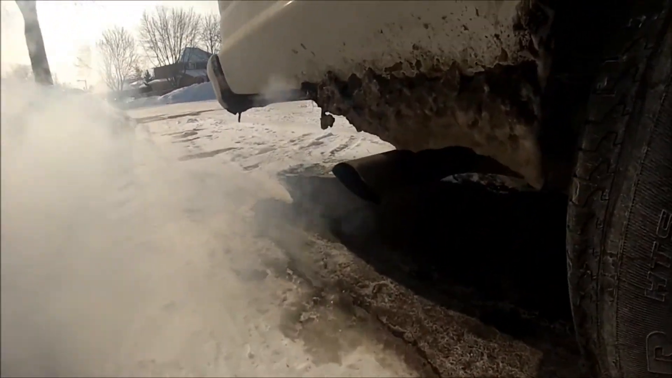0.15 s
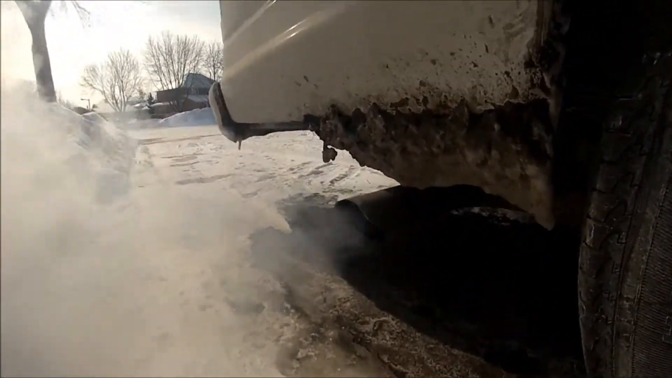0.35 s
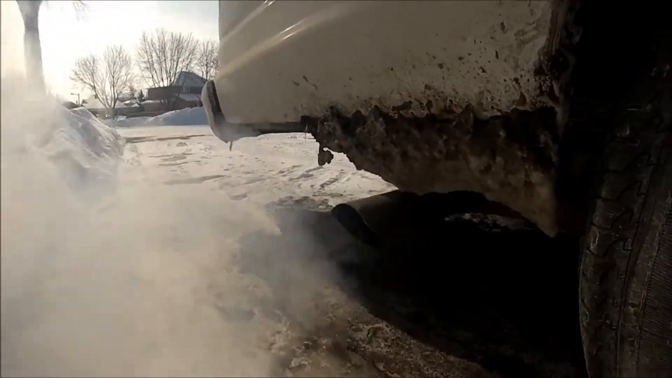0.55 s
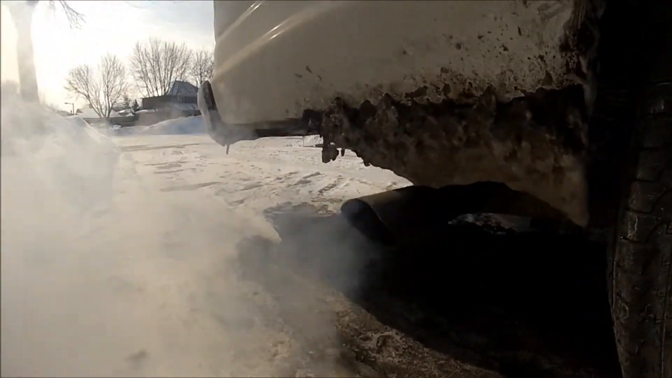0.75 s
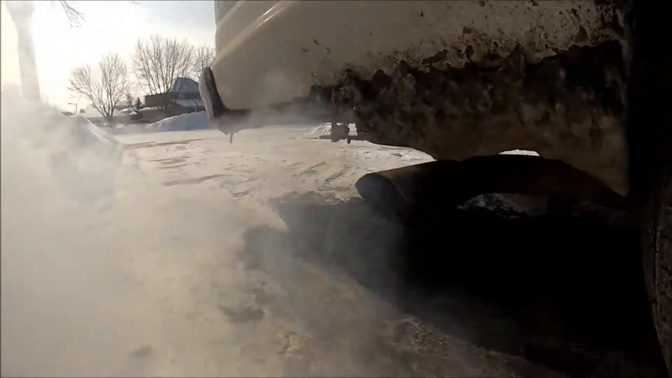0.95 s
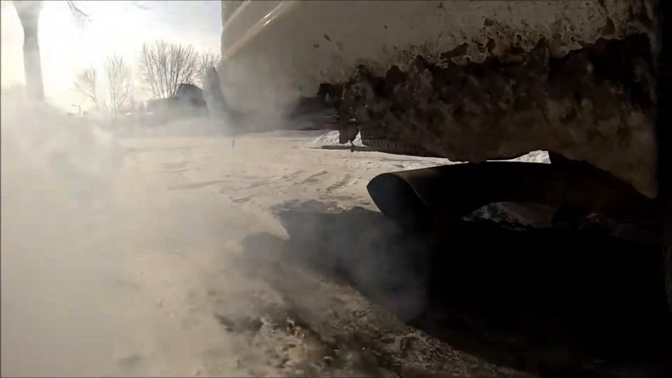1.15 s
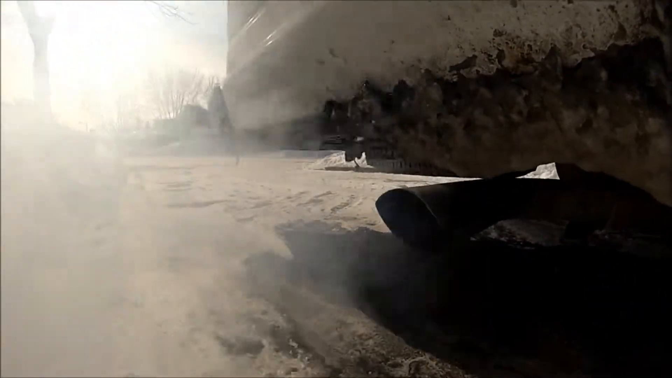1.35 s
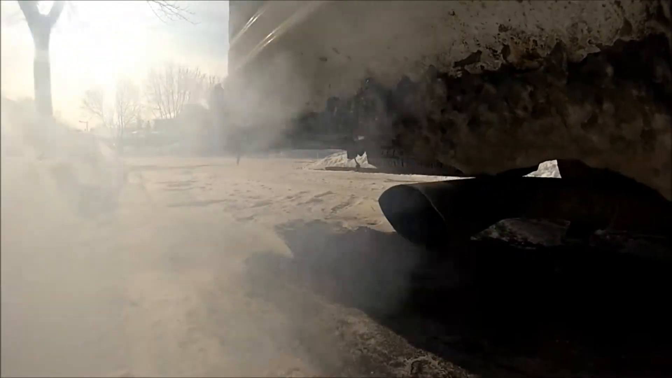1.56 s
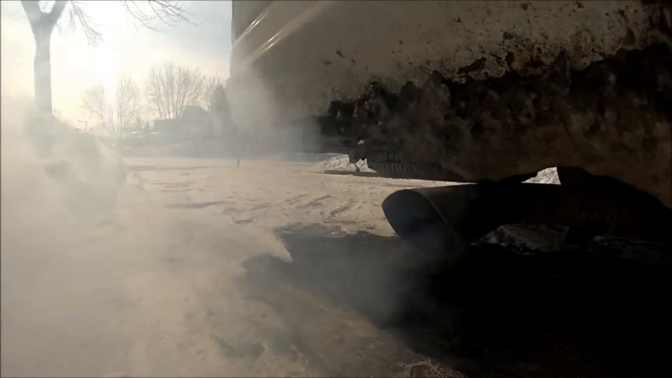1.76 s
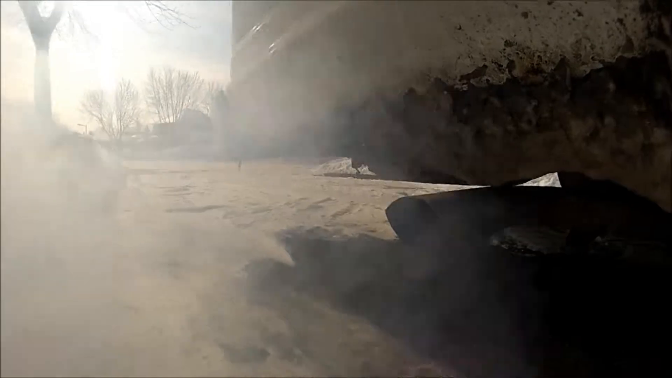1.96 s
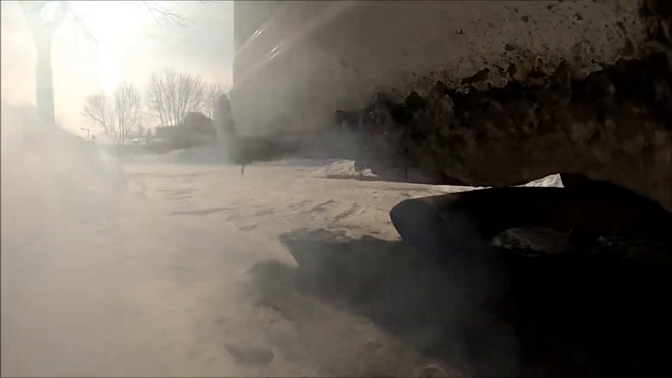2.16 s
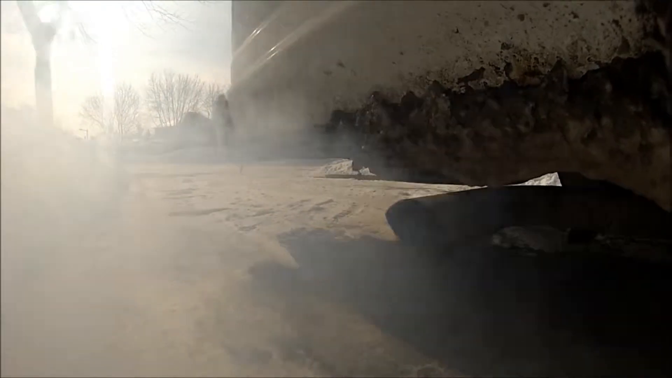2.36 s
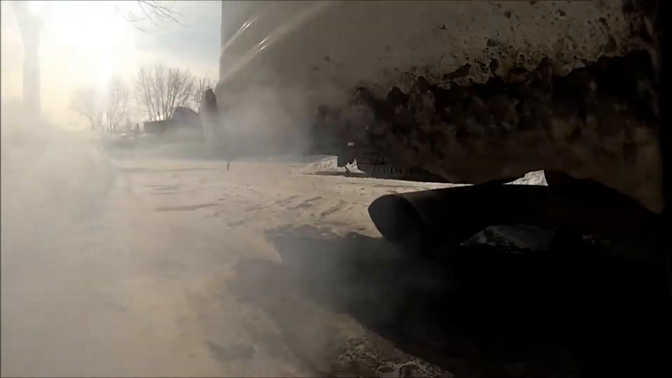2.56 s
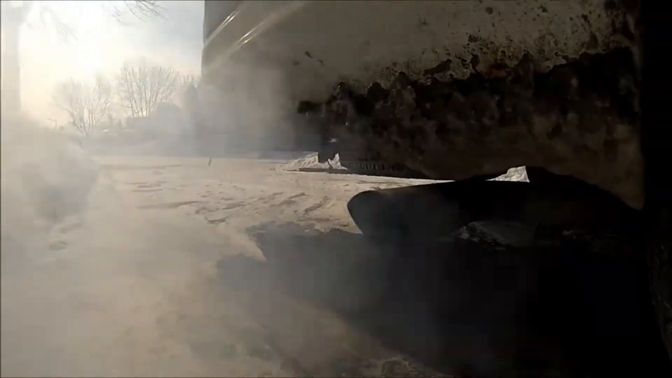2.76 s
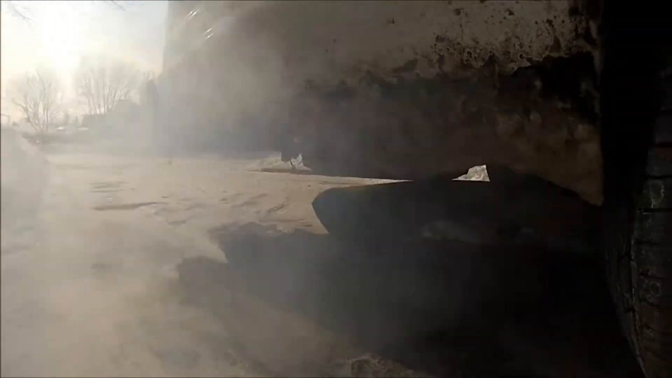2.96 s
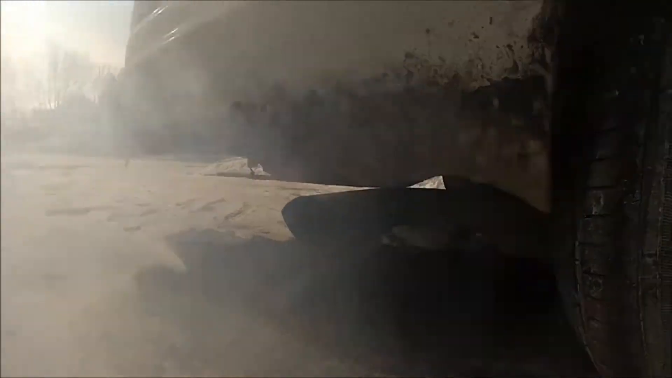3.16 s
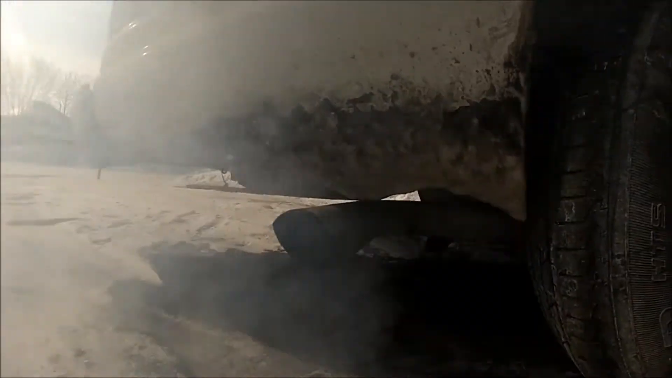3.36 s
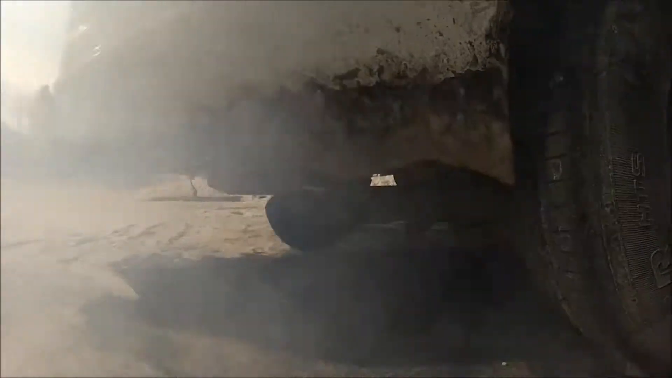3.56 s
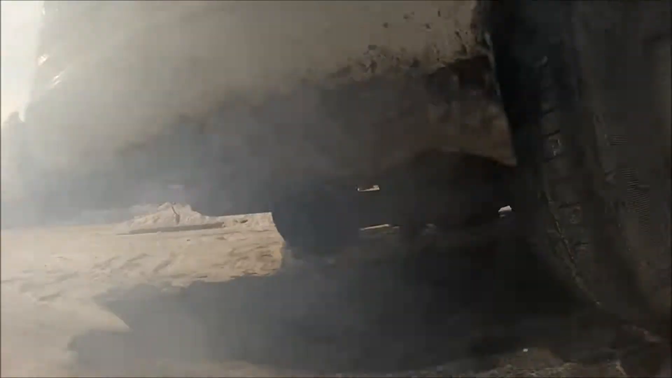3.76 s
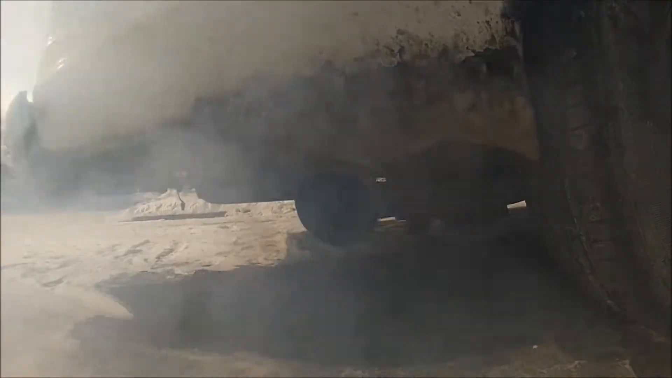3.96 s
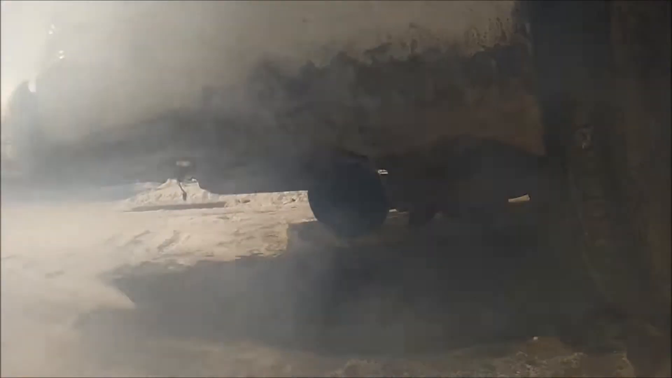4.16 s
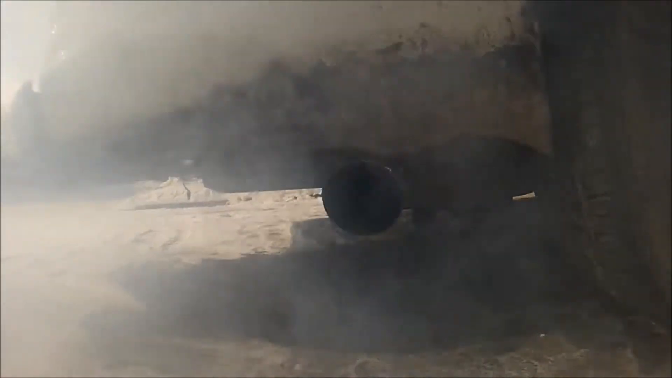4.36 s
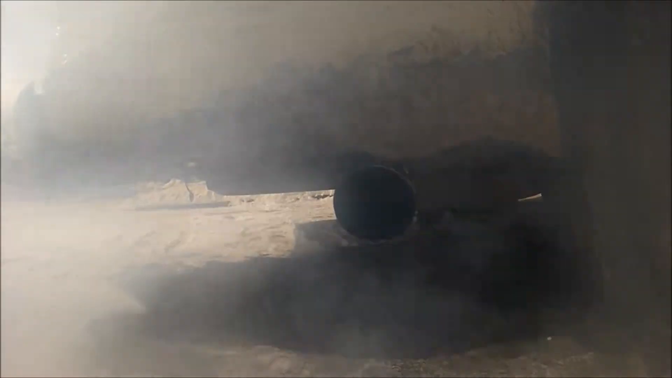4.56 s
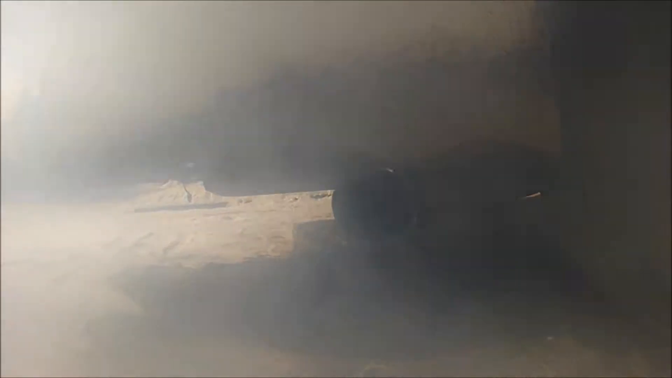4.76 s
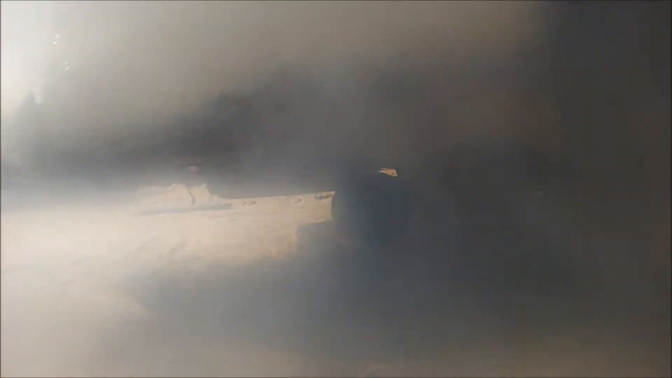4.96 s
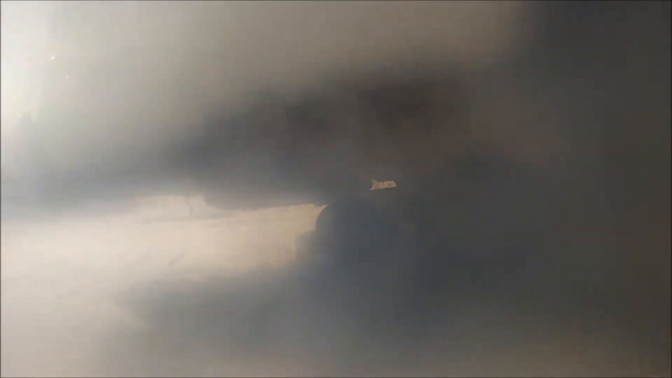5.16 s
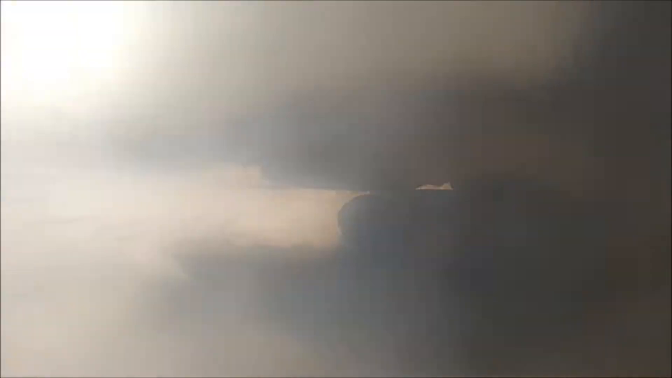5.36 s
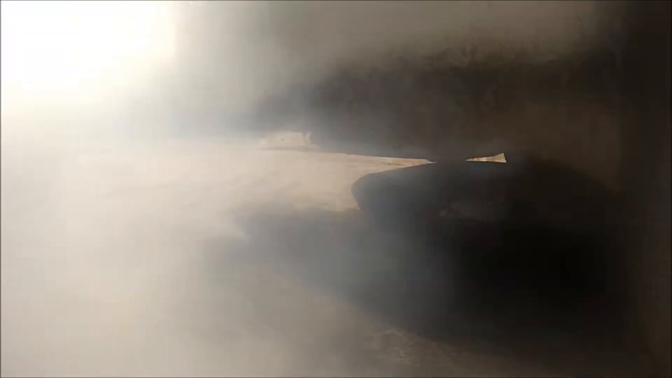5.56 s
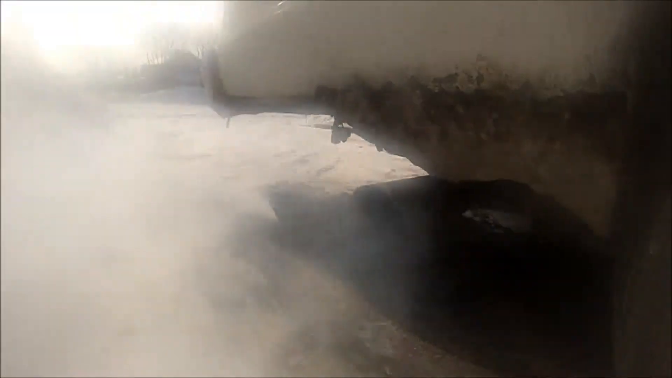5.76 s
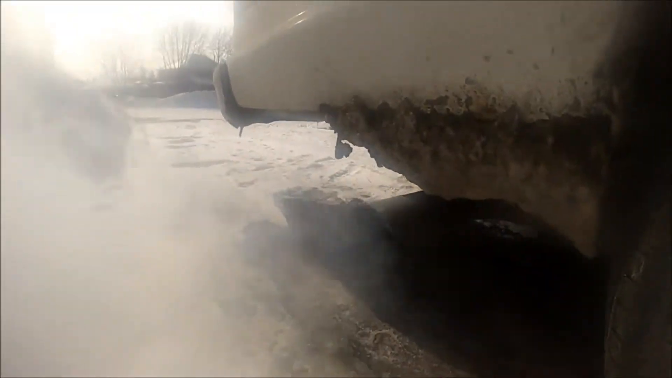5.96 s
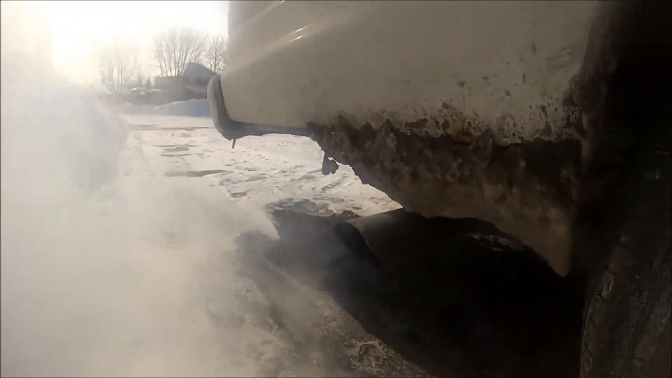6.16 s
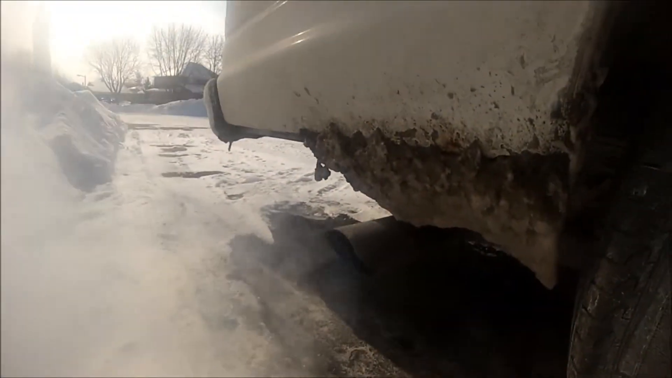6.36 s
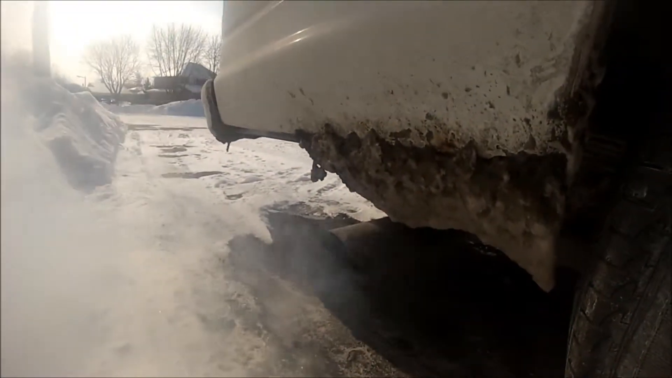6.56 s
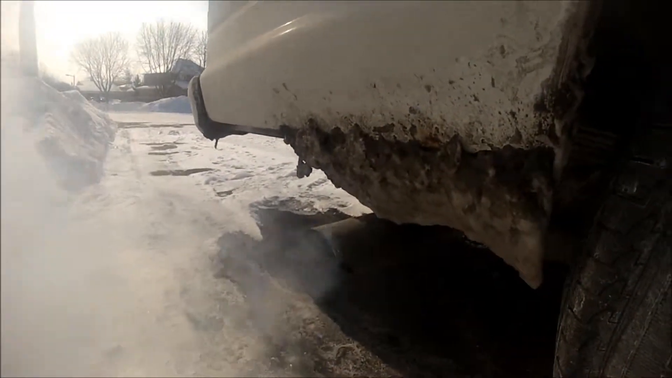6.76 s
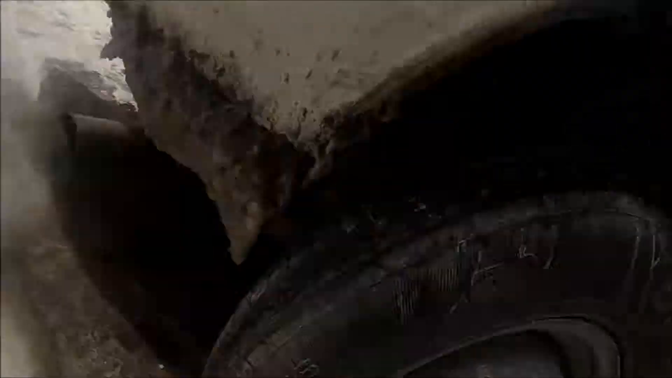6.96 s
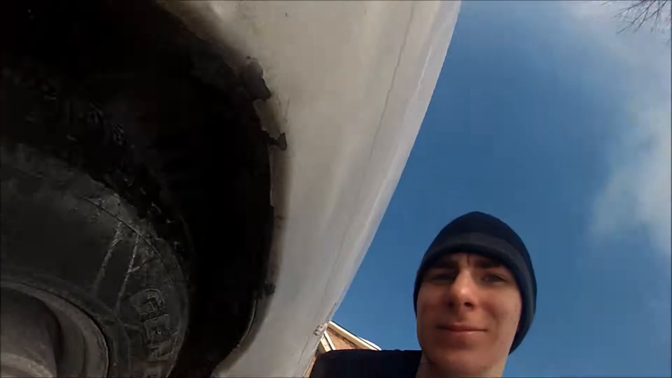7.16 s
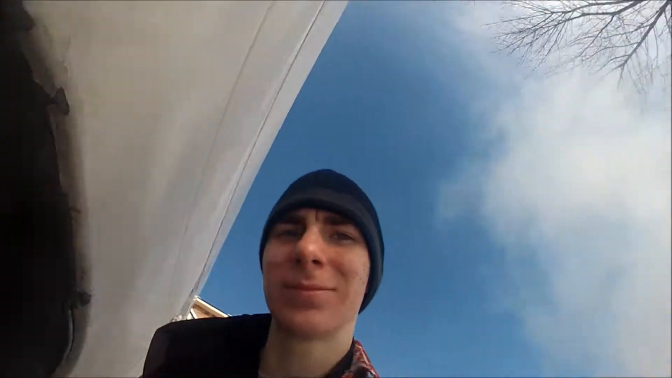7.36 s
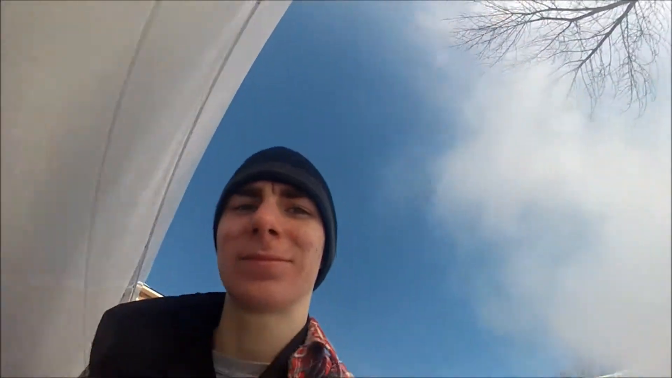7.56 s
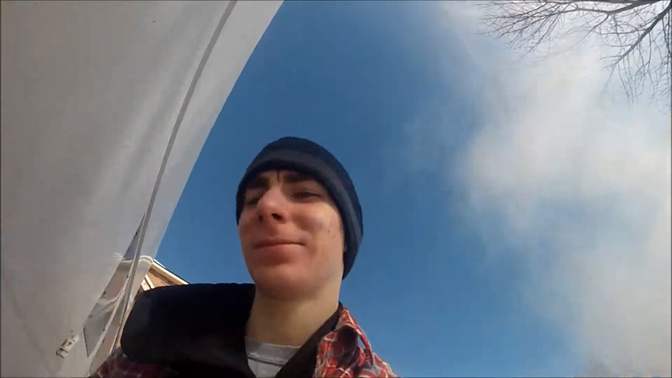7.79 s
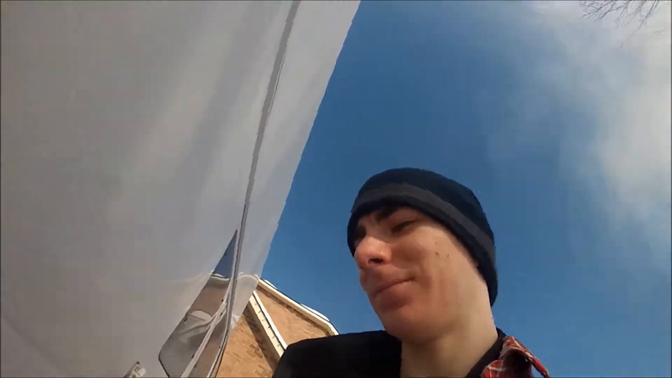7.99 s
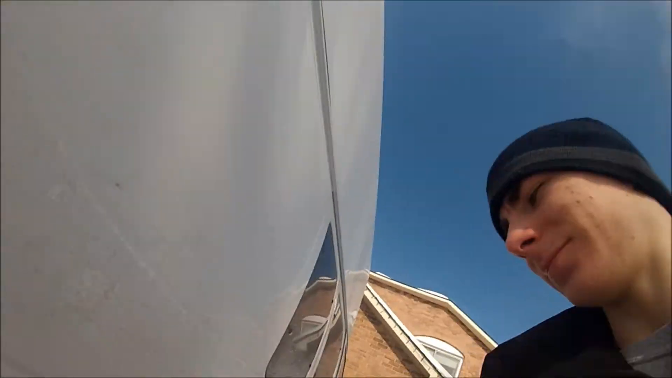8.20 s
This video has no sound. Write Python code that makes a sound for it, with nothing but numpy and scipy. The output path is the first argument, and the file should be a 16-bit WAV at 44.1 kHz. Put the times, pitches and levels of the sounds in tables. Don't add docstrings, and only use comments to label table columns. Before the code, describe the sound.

A large eight-cylinder diesel is already idling outdoors in the snow, heard right beside its tailpipe. Fast, uneven low throbs carry hard metallic knock, block clatter and pulsing gas hiss. Between about four and five and a half seconds exhaust gusts slap and rasp on the microphone. The steady idle returns, then the microphone swings past the wheel arch and the engine grows more distant, with one small handling knock at the end.

```python
import sys
import numpy as np
from scipy import signal
from scipy.fft import rfft, irfft, next_fast_len
from scipy.io import wavfile
from scipy.ndimage import uniform_filter1d

SR = 44100
rng = np.random.default_rng(int(sys.argv[2]) if len(sys.argv) > 2 else 0)


def level_to_linear(level):
    exponent = np.asarray(level, float) / 20
    return 10 ** exponent


def generate_wav(sig):
    pcm = np.round(np.clip(np.atleast_2d(sig).T, -1, 1) * 32767).astype(np.int16)
    wavfile.write(sys.argv[1], SR, pcm)


N = 362943
SECONDS = np.arange(N) / SR
HZ = np.fft.rfftfreq(2 * next_fast_len((N + SR) // 2), 1 / SR)

# time in [s], engine cycles done.
CRANK = [(-.0775, -3), (.0315, -2), (1.1242, 8), (2.108, 17), (2.4344, 20), (2.9808, 25), (4.0593, 35),
         (5.0465, 44), (6.2392, 55), (6.6767, 59), (7.4362, 66), (8.309, 74)]
# bank, pulse level in [dB], arrival after even spacing in [ms].
CYLINDERS = [(0, -.3, -2.83), (1, -3.4, -4.51), (0, -2.5, -4.56), (0, .3, -1.04), (1, 0, -5.47),
             (0, -3.2, -1.57), (1, -.2, -.74), (1, -1.8, -.84)]
# frequency in [Hz], width in [Hz], signed gain.
PIPES = [
    [(36.69, 26.33, 2.31), (72.09, 11.08, -1.59), (150.31, 8, -1.3), (174.5, 6, .75), (201.5, 7, .45),
     (257, 8, .6)],
    [(30.49, 24.32, 2.59), (95.44, 8.58, 3.28), (100, 22.03, -1.92)],
]
# panel knock in [dB], block knock in [dB], gas hiss in [dB].
FIRINGS = [(3, -9.5, 14), (-3.5, -17.5, 8), (5, -8.5, 5.5), (-6.5, -12.5, 12.5), (5, -17, -27),
           (-4, -9, 5.5), (-4.5, -9.5, 17), (5.5, -15, -2)]
REPEATS = (.15, .08, .03)

# time in [s], share facing away.
TURN = [
    (0, 0.0089),
    (7.06, 0.04),
    (7.17, 0.57),
    (8.23, 0.64),
]
# time in [s], nearness to tailpipe in [dB], nearness to body in [dB].
PLACE = [(0, -3.5, 0.5), (.45, -4, 1), (.7, -4.5, 1), (1.3, -2.1, 0.5), (2.6, -2, 1.04), (3.5, -1.5, 2),
         (5.4, -1.5, 2.5), (5.8, -3, -0.5), (7.3, -3.5, 0), (7.75, -7, -1.5), (8.23, -8, -4.5)]
# from in [s], to in [s], level change in [dB].
SHADED = [
    (-1, 1.1, -2),
    (1.1, 5.75, -6),
    (7.2, 7.72, 3),
    (7.72, 9, -11),
]
WHEEL_SIDE_S = (2.9, 3.6)
# time in [s], half length in [s], level in [dB].
GLIMPSES = [
    (0.677, 0.14, -53),
    (3.597, 0.25, -63),
    (6.9, 0.15, -64),
    (5.5, .2, -60),
]

# frequency in [Hz], width in [Hz], level in [dB].
PANELS = [(322, 110, -10.5), (421.4, 36, -2), (590, 640, -7.5), (726.7, 27.3, 5), (791, 52, 1.5),
          (881.7, 85, 6), (916.8, 37.7, 6), (998, 37.5, 0.5), (1216, 35, -9)]
# multiple of the cycle, level from behind in [dB], level from the wheel in [dB].
SHIELD_ORDERS = [(55, -5, -9), (56, 0, 0), (57, -4, -6), (58, 0, -10)]
# frequency in [Hz], width in [Hz].
CASTINGS = [(1720, 70), (1865, 70), (2520, 90), (2700, 80), (4800, 210)]
# frequency in [Hz], level in [dB per Hz].
BLOCK_NEAR = [(900, -50), (1100, 1), (1230, -13), (1400, -9), (1670, -2.5), (1860, -6), (2120, -3.5),
              (2610, -9), (2900, -8.5), (3500, -9.5), (4000, -18.5), (4400, -73)]
# frequency in [Hz], level in [dB per Hz].
BLOCK_AWAY = [(900, -27), (1100, 1), (1370, 1.5), (1720, -2.5), (2040, -14), (2300, -11), (2520, -10),
              (2750, -17), (3020, -1.5), (3400, -19), (3900, -10), (4300, -70)]
# frequency in [Hz], level in [dB per Hz].
HISS_NEAR = [(3300, -19), (3800, 4), (4200, 7.5), (4800, 2), (5500, 0.5), (6200, -4.5), (7200, -8.5),
             (8700, -9.5), (9600, -12), (10600, -15.5), (11800, -12), (13800, -22), (15200, -29)]
# frequency in [Hz], level in [dB per Hz].
HISS_AWAY = [(3600, -41), (4200, -3), (4900, -1), (5420, 6), (6420, -4.5), (7200, -12), (8670, -24),
             (9500, -30), (10600, -22), (11700, -23), (12800, -23), (14000, -37), (15200, -42)]
# frequency in [Hz], level in [dB per Hz].
RUMBLE = [(15, -30), (40, -17), (100, -3), (175, -2), (215, -10), (340, -8), (420, -12), (600, -30)]
# time in [s], peak level in [dB].
PINGS = [(1.415, -17), (1.469, -16.5), (1.797, -19.5), (2.327, -22), (5.442, -29), (5.661, -21),
         (7.41, -20), (7.839, -39), (7.889, -28)]
# share of the cycle, level in [dB], ring in [Hz], ring width in [Hz].
CONTACTS = [(.03, -51, 1860, 250), (.215, -55, 4500, 1500), (.45, -61, 1250, 120), (.455, -54, 1720, 200),
            (.47, -54, 2700, 300), (.515, -50, 1720, 200), (.59, -59, 1250, 120), (.88, -47, 1860, 200),
            (.885, -55, 2550, 300), (.91, -61, 1250, 120), (.955, -49, 1860, 200), (.975, -52, 2550, 300)]
# time in [s], level in [dB].
CONTACT_FADE = [(0, -2), (.4, -1), (.68, 2), (.95, 0), (1.3, -3), (3.3, -3), (3.6, -1), (5.5, -8),
                (7.1, -10), (7.3, -13), (8.23, -14)]
# time in [s], half length in [s], ring in [Hz], level in [dB].
ARCH_RINGS = [
    (7.203, .012, 3320, -49),
    (7.335, .025, 3300, -49),
    (7.413, .014, 3370, -48),
    (7.545, .02, 3500, -52),
]

# time in [s], level in [dB].
JET = [(0, -47), (3.6, -49), (3.75, -28.5), (4.1, -20), (4.7, -22), (5.1, -21.5), (5.3, -33), (5.55, -29.5),
       (5.68, -50), (8.23, -51)]
# frequency in [Hz], level in [dB per Hz].
THUMP = [(15, -34), (45, 0), (90, -6), (160, -10), (300, -35), (500, -21.5)]
# frequency in [Hz], level in [dB per Hz].
RASP = [(150, 9.5), (300, 18), (550, 4.5), (900, 6.5), (1400, -13.5), (3000, -17), (14000, -47)]
# time in [s], peak in [dB], frequency in [Hz], push +1 or
SLAPS = [(3.7439, -18, 55, -1), (3.8518, -11, 70, -1), (3.9584, -9, 55, -1), (3.9718, -14, 98, 1),
         (4.0643, -6, 70, -1), (4.0885, -18, 55, 1), (4.1654, -16, 55, 1), (4.1799, -9, 137, -1),
         (4.1824, -5, 60, 1), (4.277, -12, 137, 1), (4.2899, -5, 70, 1), (4.3028, -13, 98, 1),
         (4.3187, -17, 90, 1), (4.3475, -17, 83, 1), (4.3861, -6, 137, 1), (4.3915, -7, 55, -1),
         (4.3965, -12, 137, -1), (4.4142, -12, 161, 1), (4.4307, -14, 55, 1), (4.4375, -15, 116, 1),
         (4.4629, -17, 77, -1), (4.4992, -8, 137, -1), (4.5139, -6, 90, 1), (4.5389, -13, 55, 1),
         (4.552, -12, 90, -1), (4.6108, -11, 98, -1), (4.6219, -8, 98, 1), (4.6282, -17, 55, -1),
         (4.6425, -11, 161, 1), (4.7121, -17, 55, 1), (4.7255, -12, 116, -1), (4.7416, -15, 107, 1),
         (4.7543, -11, 98, -1), (4.8378, -12, 55, 1), (4.8409, -3, 98, 1), (4.8573, -16, 83, 1),
         (4.9176, -19, 55, -1), (4.9341, -13, 116, -1), (4.9473, -4, 137, -1), (4.9498, -15, 83, -1),
         (4.9661, -8, 70, 1), (5.0201, -18, 70, 1), (5.0461, -13, 190, -1), (5.0518, -12, 55, -1),
         (5.0693, -15, 107, -1), (5.0797, -15, 137, 1), (5.2706, -12, 55, -1), (5.2743, -15, 116, -1),
         (5.2992, -16, 55, -1), (5.379, -13, 55, -1),
         (3.7626, -20, 108, 1), (3.7715, -18, 121, -1), (3.8801, -18, 110, -1), (3.993, -17, 80, 1),
               (5.1543, -14, 110, 1), (5.1753, -15, 100, 1), (5.2629, -12, 112, 1), (5.415, -17, 90, 1),
               (5.4805, -18, 114, 1), (5.507, -20, 85, 1)]
# time in [s], peak in [dB], flutter in [Hz], length in [s].
RASPS = [(3.9553, -12, 390, 0.003), (3.9669, -17, 310, 0.002), (3.9791, -17, 310, 0.003),
         (4.0687, -17, 900, 0.002), (4.0735, -16, 390, 0.002), (4.168, -20, 340, 0.0045),
         (4.176, -15, 800, 0.002), (4.1787, -12, 270, 0.007), (4.1862, -20, 310, 0.0045),
         (4.2807, -17, 630, 0.002), (4.2848, -16, 240, 0.007), (4.2884, -17, 900, 0.002),
         (4.2884, -12, 560, 0.003), (4.2966, -19, 270, 0.0045), (4.2971, -22, 630, 0.007),
         (4.2973, -18, 800, 0.003), (4.3878, -10, 800, 0.002), (4.4014, -13, 310, 0.003),
         (4.415, -15, 310, 0.002), (4.4993, -14, 800, 0.002), (4.4995, -20, 440, 0.007),
         (4.5059, -12, 340, 0.0045), (4.5093, -20, 240, 0.007), (4.5211, -14, 310, 0.003),
         (4.6118, -19, 900, 0.003), (4.6134, -16, 390, 0.002), (4.6215, -15, 310, 0.003),
         (4.6376, -17, 390, 0.003), (4.7227, -10, 340, 0.003), (4.7259, -17, 900, 0.0045),
         (4.729, -17, 440, 0.002), (4.7447, -17, 310, 0.003), (4.8293, -12, 630, 0.002),
         (4.8295, -17, 1020, 0.002), (4.8299, -10, 310, 0.0045), (4.8356, -17, 800, 0.003),
         (4.8361, -14, 390, 0.002), (4.8406, -12, 340, 0.003), (4.9372, -20, 560, 0.007),
         (4.9372, -12, 340, 0.0045), (4.9478, -12, 340, 0.003), (4.9655, -21, 340, 0.007),
         (5.0485, -17, 800, 0.0045), (5.049, -12, 270, 0.007), (5.0533, -15, 440, 0.002),
         (5.0608, -17, 490, 0.0045), (5.0737, -22, 270, 0.007), (5.2687, -18, 440, 0.0045),
         (5.2834, -20, 270, 0.0045), (5.3776, -13, 340, 0.002),
         (3.854, -22, 500, .005), (3.957, -18, 750, .003), (4.057, -22, 540, .004),
               (4.066, -20, 620, .005), (5.064, -21, 720, .005), (5.161, -17, 665, .004),
               (5.163, -23, 950, .003), (5.172, -19, 390, .005), (5.269, -20, 750, .003),
               (5.279, -20, 500, .005), (5.377, -17, 720, .002)]

# time in [s], peak in [dB], frequency in [Hz], width in [Hz].
TICKS = [
    (.001, -36, 9000, 12000),
    (1.0625, -35, 4000, 5000),
    (1.366, -39, 6000, 8000),
    (5.1985, -28, 4500, 4500),
    (5.1985, -46, 11000, 3500),
]
# frequency in [Hz], level in [dB], 60 dB decay in [s].
CRACK = [(1900, -6, .01), (2519, -1, .009), (3100, -1, .009), (3800, -7, .008), (4500, -4, .009),
         (5900, -5, .007), (6900, -12, .005), (9000, -20, .005)]


def rms_one(x):
    return x / np.sqrt(np.mean(x ** 2) + 1e-20)


def evened(x, seconds):
    return x / np.sqrt(uniform_filter1d(x ** 2, round(seconds * SR)) + 0.22)


def in_time(rows):
    s, *columns = np.transpose(rows)
    return [np.interp(SECONDS, s, column) for column in columns]


def passing(s, half_s):
    return np.exp(-((SECONDS - s) / half_s) ** 2)


def through(x, response):
    return irfft(rfft(x, 2 * len(HZ) - 2) * response)[:N]


def colour(points):
    hz, db = np.transpose(points)
    return level_to_linear(np.interp(np.log(HZ + 1), np.log(hz), db, left=-90, right=-90))


def resonance(hz, width_hz):
    return 1j * HZ * width_hz / (hz ** 2 - HZ ** 2 + 1j * HZ * width_hz)


def drift(rate_hz):
    r = np.exp(-2 * np.pi * rate_hz / SR)
    noise = rng.standard_normal(N + SR)
    return rms_one(signal.lfilter([1], [1, -2 * r, r * r], noise)[SR:])


def clicks(times, sizes):
    out = np.zeros(N + SR)
    at = np.round(np.asarray(times) * SR).astype(int)
    np.add.at(out, at[at >= 0], np.asarray(sizes)[at >= 0])
    return out[:N]


def firing_times():
    s, cycles = np.transpose(CRANK)
    count = np.arange(-24, 592)
    return np.interp(count / 8, cycles, s), count % 8


def crank_angle():
    return np.interp(SECONDS, *np.transpose(CRANK))


def repeating(share):
    memory, steps = .9, 4800
    angle = crank_angle() + 3
    fresh = rng.standard_normal((110, steps))
    turns = signal.lfilter([np.sqrt(1 - memory ** 2)], [1, -memory], fresh, axis=0)[30:]
    again = turns[angle.astype(int), (angle % 1 * steps).astype(int)]
    return np.sqrt(share) * again + np.sqrt(1 - share) * rng.standard_normal(N)


def levels():
    (pipe, body), (jet,) = in_time(PLACE), in_time(JET)
    lift = 0.33 * np.maximum(jet + 29.5, 0)
    fade_s = 0.06
    shade = sum(db * (np.tanh((SECONDS - start) / fade_s) - np.tanh((SECONDS - end) / fade_s)) / 2
                for start, end, db in SHADED)
    return {
        "pulse": -26 + pipe + lift,
        "panel": -38 + body + lift,
        "shield": -43.5 + shade + lift,
        "block": -44.5 + body + 0.73 * lift,
        "hiss": -56 + body + 0.68 * lift,
        "hiss top": 3.5 - 0.78 * body,
        "arch": -61 + 5 * passing(7.32, 0.2),
    }


def engine():
    level = levels()
    rumble = level_to_linear(-45.5) * rms_one(through(repeating(.5), colour(RUMBLE)))
    knock = knocking(0, late_s=0.009, rise_s=0.0012, decay_s=0.006, steady=1.1, uneven_db=2.5)
    clatter = knocking(1, late_s=-0.0037, rise_s=0.00085, decay_s=0.018, steady=1.0, uneven_db=2.5)
    facing_away, = in_time(TURN)
    arch = facing_away * rms_one(through(clatter, resonance(3440, 850) ** 2))
    return (level_to_linear(level["pulse"]) * pulses(uneven_db=.45, jitter_ms=0.093)
            + rumble
            + level_to_linear(level["panel"]) * panel_ring(knock)
            + level_to_linear(level["shield"]) * shield_ring(knock)
            + level_to_linear(level["block"]) * block_clatter(clatter)
            + level_to_linear(level["arch"]) * arch
            + glimpses(clatter)
            + level_to_linear(level["hiss"]) * gas_hiss(level["hiss top"]))


def pulses(uneven_db, jitter_ms):
    s, cylinder = firing_times()
    bank, db, lag_ms = np.array(CYLINDERS)[cylinder].T
    chance = rng.standard_normal((len(s), 2))
    s = s + (lag_ms + jitter_ms * chance[:, 0]) / 1000
    sizes = level_to_linear(db + uneven_db * chance[:, 1])
    out = 0
    for k, pipe in enumerate(PIPES):
        response = sum(gain * resonance(hz, width_hz) for hz, width_hz, gain in pipe)
        out = out + through(clicks(s, sizes * (bank == k)), response)
    notch = 1 - .7 * resonance(220.5, 20)
    return rms_one(through(out, notch / np.sqrt(1 + (HZ / 210) ** 8)))


def knocking(layer, late_s, rise_s, decay_s, steady, uneven_db):
    s, cylinder = firing_times()
    sizes = level_to_linear(np.array(FIRINGS)[cylinder, layer] + uneven_db * rng.standard_normal(len(s)))
    rise = 1 / (1 + 2j * np.pi * HZ * rise_s) ** 2
    decay = 1 / (1 + 2j * np.pi * HZ * decay_s)
    swell = through(clicks(abs(s + late_s), sizes * (s > -.03)), rise * decay)
    return (steady + swell / swell.mean()) * repeating(REPEATS[layer])


def muffled():
    return 1 / (1 + (HZ / 1700) ** 4)


def panel_ring(knock):
    modes = sum((-1) ** k * level_to_linear(db) * resonance(hz, width_hz)
                for k, (hz, width_hz, db) in enumerate(PANELS))
    return rms_one(through(knock, modes * muffled()))


def shield_ring(knock):
    wheel_side = np.interp(SECONDS, WHEEL_SIDE_S, [0, 1])
    angle = crank_angle()
    hum = 0
    for k, rear_db, wheel_db in SHIELD_ORDERS:
        db = rear_db + wheel_side * (wheel_db - rear_db) + .8 * drift(3)
        hum = hum + level_to_linear(db) * np.sin(2 * np.pi * k * angle + k ** 2 + .3 * drift(3))
    rattle = rms_one(through(knock, muffled() * resonance(518, 28)))
    return rms_one(rattle + 2.8 * hum)


def patchy(x, near, away, patchy_db):
    share, = in_time(TURN)
    facing = (1 - share) * rms_one(through(x, colour(near)))
    x = facing + share * rms_one(through(x, colour(away)))
    centres = np.geomspace(near[0][0], near[-1][0], num=6)
    step = np.log(centres[1] / centres[0])
    out = 0
    for centre in centres:
        band = np.clip(1 - abs(np.log((HZ + 1) / centre)) / step, 0, 1)
        out = out + level_to_linear(patchy_db * drift(1.5)) * through(x, band)
    return rms_one(out)


def block_clatter(clatter):
    rings = sum(resonance(hz, width_hz) for hz, width_hz in CASTINGS[:4])
    return patchy(through(clatter, 1 + .9 * rings), BLOCK_NEAR, BLOCK_AWAY, patchy_db=.7)


def glimpses(clatter):
    seen = sum(level_to_linear(db) * passing(s, half_s) for s, half_s, db in GLIMPSES)
    rings = sum(resonance(hz, width_hz) for hz, width_hz in CASTINGS[:4])
    return seen * rms_one(through(clatter, rings ** 2))


def gas_hiss(top_db):
    gas = knocking(2, late_s=-.008, rise_s=.007, decay_s=.007, steady=.6, uneven_db=1.5)
    hiss = patchy(through(gas, 1 + .8 * resonance(*CASTINGS[4])), HISS_NEAR, HISS_AWAY, patchy_db=.5)
    return hiss + (level_to_linear(top_db) - 1) * through(hiss, 1 / (1 + (6500 / (HZ + 1)) ** 8))


def pings():
    s, db = np.transpose(PINGS)
    panels = resonance(880, 100) - 0.67 * resonance(660, 90)
    return through(clicks(s, level_to_linear(db - 6)), panels) * SR / (2 * np.pi * 110)


def contacts():
    s, cycles = np.transpose(CRANK)
    out = 0
    for part, db, hz, width_hz in CONTACTS:
        at = np.interp(np.arange(-2, 73) + part, cycles, s)
        chance = rng.standard_normal((len(at), 2))
        sizes = level_to_linear(3.0 * np.clip(chance[:, 1], -2, 1.2))
        ring = through(clicks(at + 5e-4 * chance[:, 0], sizes), resonance(hz, width_hz) ** 2)
        out = out + level_to_linear(db) * ring * SR / (2 * width_hz)
    return level_to_linear(9 + in_time(CONTACT_FADE)[0]) * out


def arch_rings():
    noise = rng.standard_normal(N)
    out = 0
    for s, half_s, hz, db in ARCH_RINGS:
        ring = evened(rms_one(through(noise, resonance(hz, 200) ** 2)), .01)
        out = out + level_to_linear(db) * passing(s, half_s) * ring
    return out


def buffeting():
    low = evened(rms_one(through(rng.standard_normal(N), colour(THUMP))), 0.02)
    fluttering = level_to_linear(3.9 * drift(164)) * rng.standard_normal(N)
    high = evened(rms_one(through(fluttering, colour(RASP))), 0.0072)
    spray = level_to_linear(-39) * through(rng.standard_normal(N), resonance(5000, 9000))
    eddies_db, = in_time(JET)
    out = level_to_linear(eddies_db - 4 + 2.5 * drift(23)) * low + level_to_linear(eddies_db - 15) * high
    reach = 2000
    t = np.arange(-reach, reach) / SR
    for s, peak_db, hz, push in SLAPS:
        span = slice(round(s * SR) - reach, round(s * SR) + reach)
        slap = push * np.exp(-(t * hz / .7) ** 2) * np.cos(2 * np.pi * hz * t)
        wash = np.exp(-(t / .016) ** 2) * (low[span] + .5 * high[span])
        out[span] += level_to_linear(peak_db) * slap + level_to_linear(peak_db - 20) * wash
    for s, peak_db, flutter_hz, length_s in RASPS:
        span = slice(round(s * SR) - reach, round(s * SR) + reach)
        flutter = np.cos(2 * np.pi * (flutter_hz * t + rng.random()) + .5 * high[span])
        u = t / length_s + .15
        edge = np.exp(-(u / np.where(u < 0, .85, 1.3)) ** 2)
        out[span] += level_to_linear(peak_db) * edge * (.16 * high[span] + flutter + .35 * spray[span])
    return out


def ticks():
    out = np.zeros(N)
    for s, db, hz, width_hz in TICKS:
        moments = s + np.sort(rng.uniform(0, .002, 5))
        crack = clicks(moments, rng.choice([-1, 1], 5) * [1, .8, .7, .5, .4])
        crack = through(crack, resonance(hz, width_hz) ** 2 + .01 / (1 + (HZ / 8000) ** 4))
        out += level_to_linear(db) * crack / abs(crack).max()
    return out


def housing_knock():
    knock_s, knock_db = 8.088, -30
    out = 0
    for late_s, loss_db in [(0, -1), (.0016, -4)]:
        t = np.maximum(SECONDS - knock_s - late_s, 0)
        rings = sum(level_to_linear(knock_db + loss_db + db - 60 * t / t60) * np.sin(2 * np.pi * hz * t)
                    for hz, db, t60 in CRACK)
        out = out + (1 - np.exp(-t / 3e-4)) * rings
    return out


def scene():
    machine = engine() + pings() + contacts() + arch_rings()
    return (machine + buffeting() + ticks() + housing_knock())[None]


def band_limit(x):
    return signal.sosfilt(signal.butter(12, 15330, fs=SR, output="sos"), x)


def record(dry):
    level_db = 20 * np.log10(uniform_filter1d(abs(dry[0]), size=220) + 1e-6)
    slope = 57 * SECONDS
    held_db = np.maximum.accumulate(level_db + slope) - slope
    duck_db = -.7 * np.maximum(held_db + 17, 0)
    lag = np.exp(-1 / (.006 * SR))
    x = dry * level_to_linear(signal.lfilter([1 - lag], [1, -lag], duck_db))
    x = 1.14 * np.tanh(x / .95)
    top_cut = signal.cheby2(12, 40, 15700, fs=SR, output="sos")
    return band_limit(signal.sosfilt(top_cut, x))


dry = scene()
out = record(dry)
generate_wav(out)
```